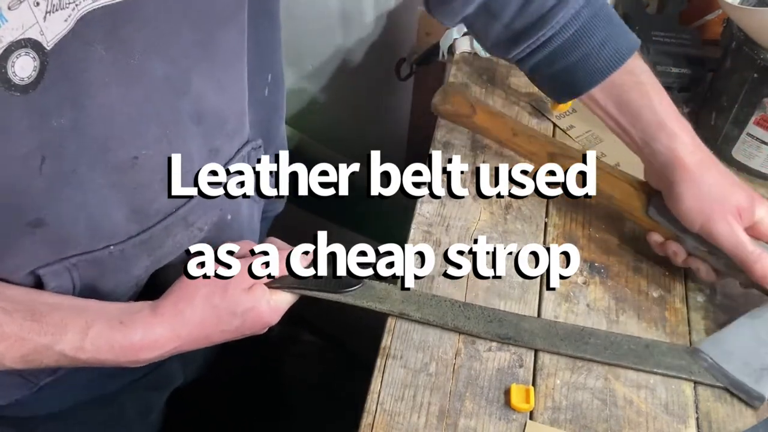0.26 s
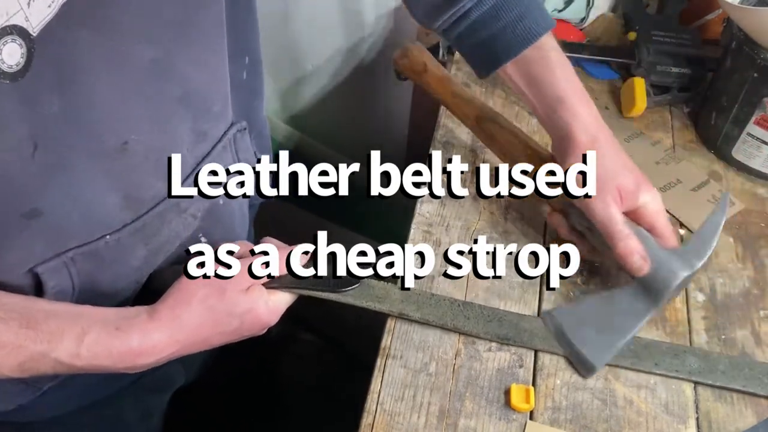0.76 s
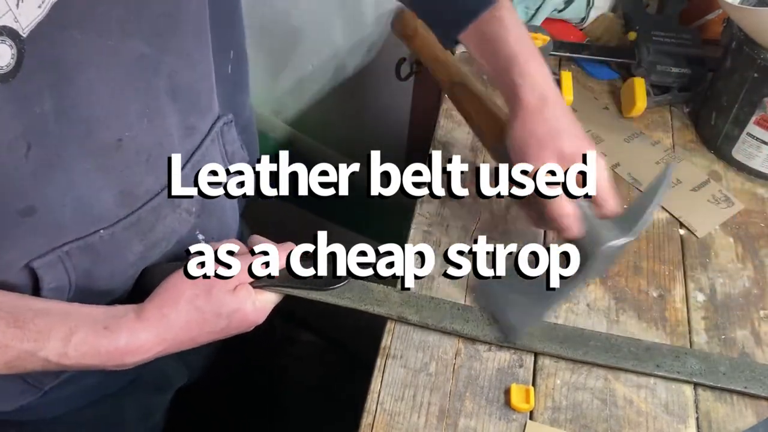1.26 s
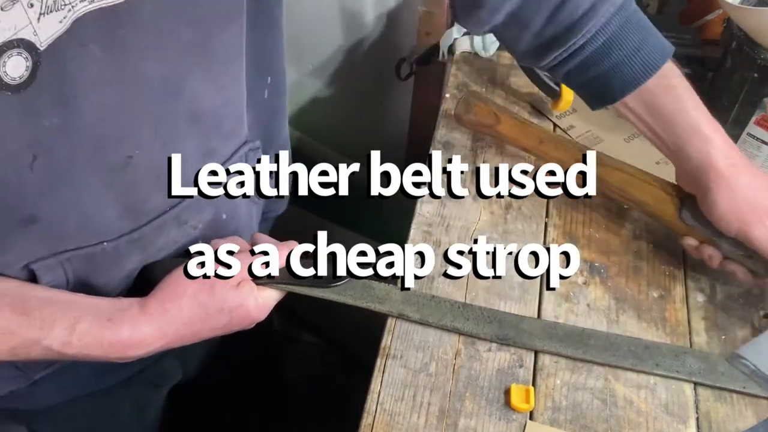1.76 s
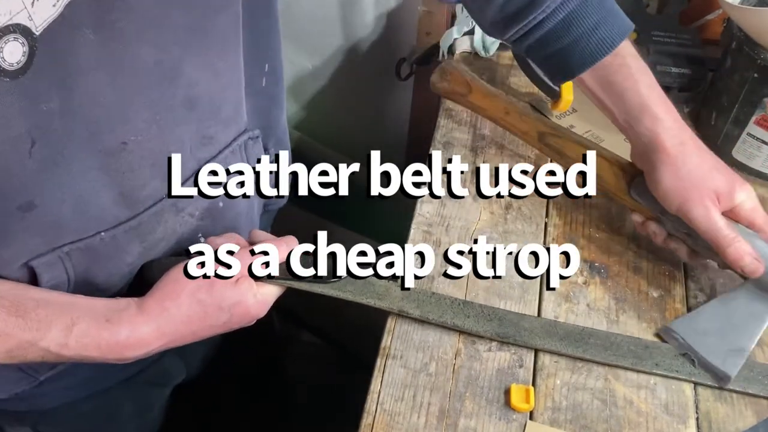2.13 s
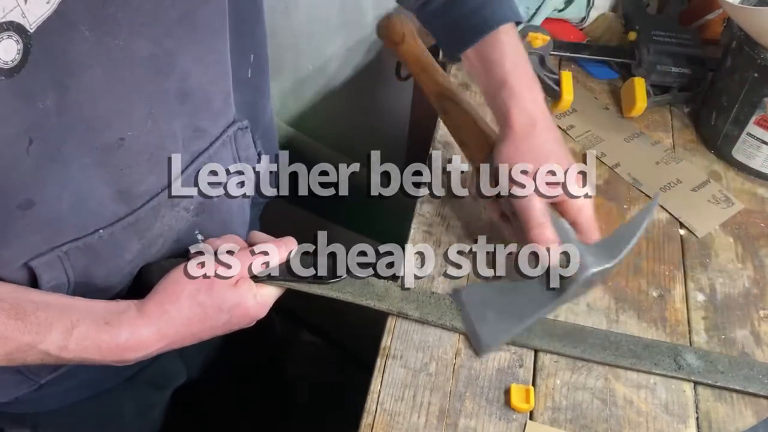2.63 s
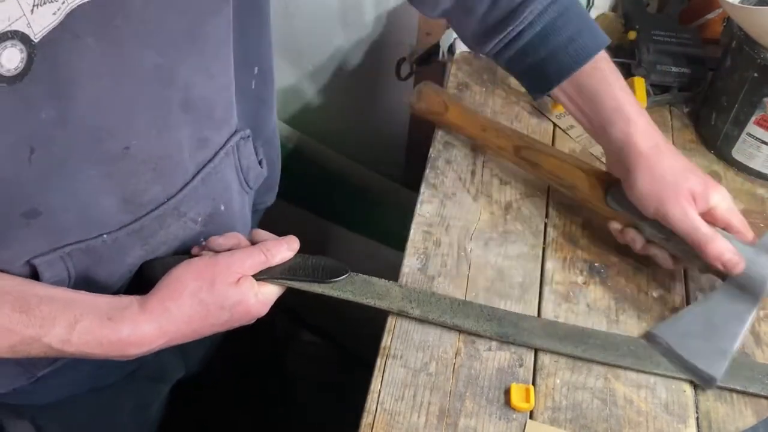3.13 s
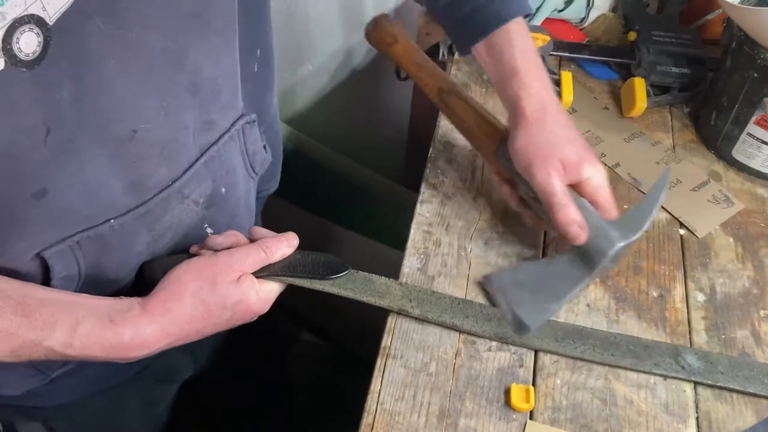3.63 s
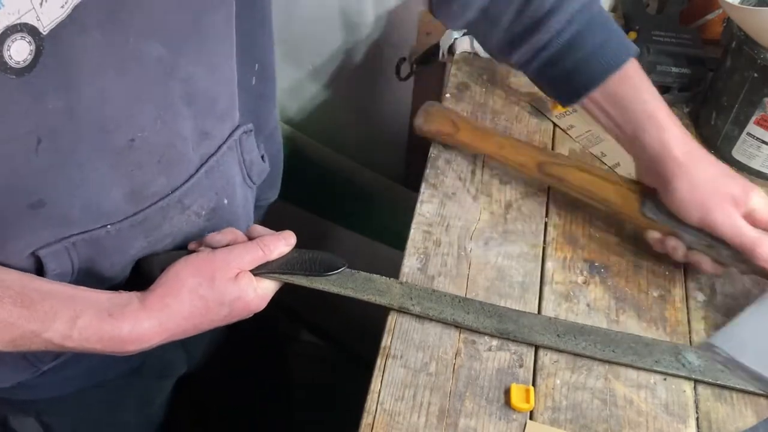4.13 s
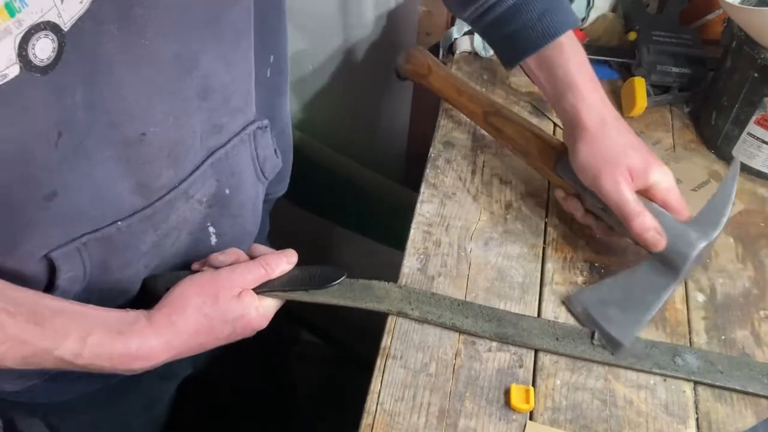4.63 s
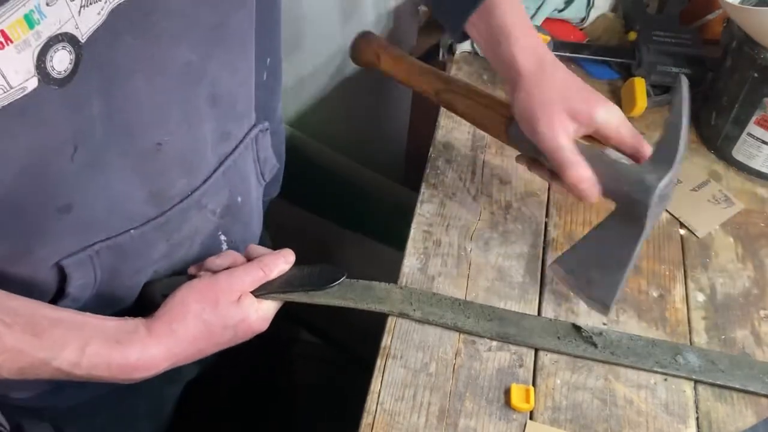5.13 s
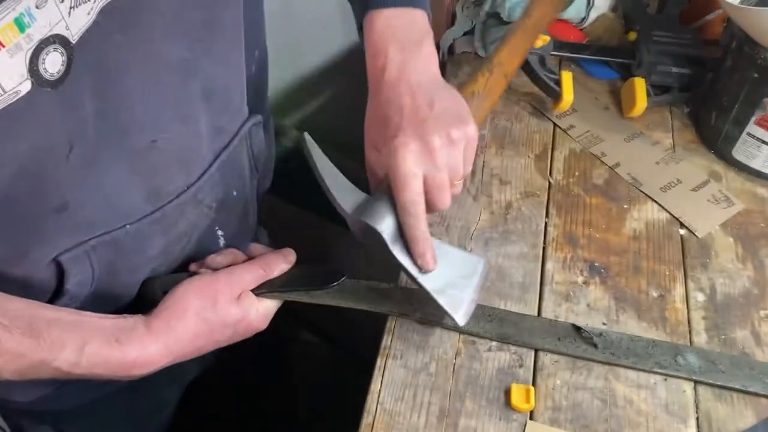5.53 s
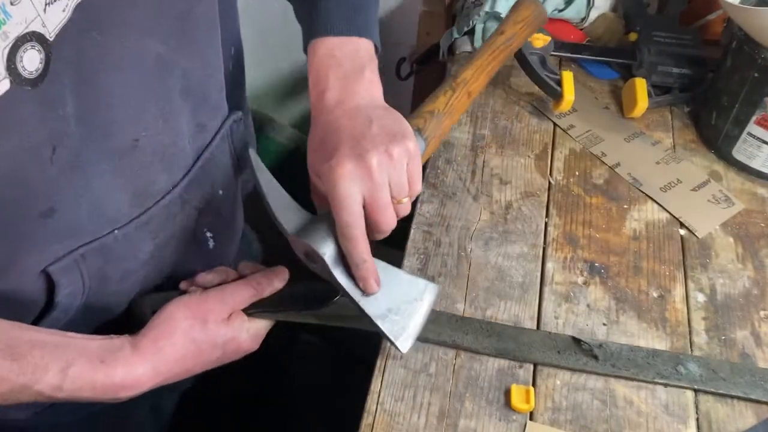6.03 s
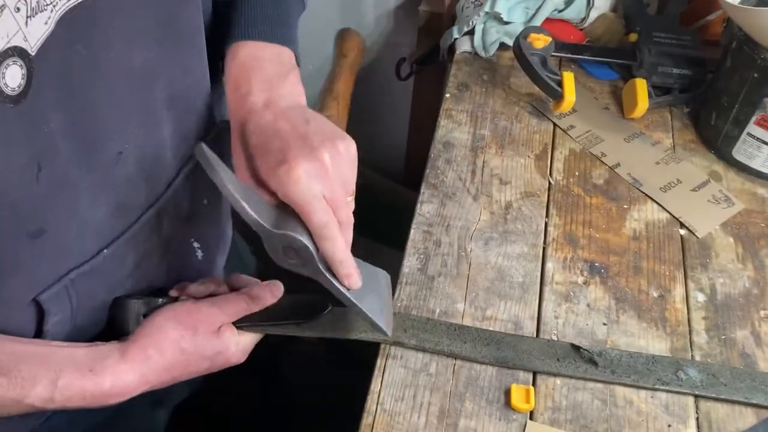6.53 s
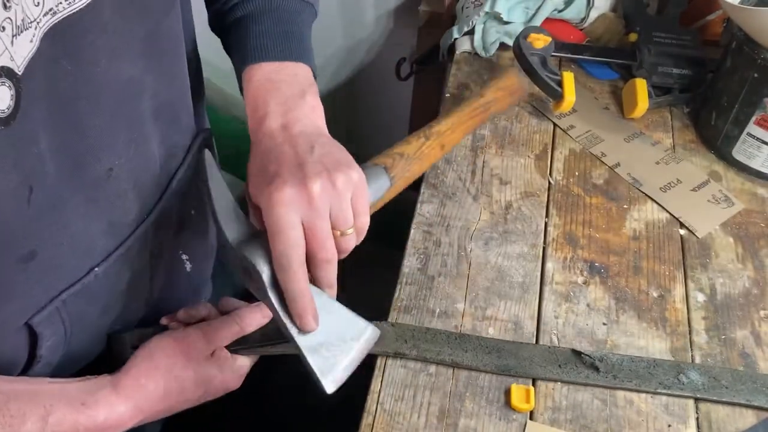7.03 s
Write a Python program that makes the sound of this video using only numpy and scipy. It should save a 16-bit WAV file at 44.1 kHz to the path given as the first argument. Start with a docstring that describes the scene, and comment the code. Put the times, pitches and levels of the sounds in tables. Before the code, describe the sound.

A small, dry workshop heard close to a phone, with quiet room air and a faint unsteady low hum throughout. From the start, steel rubs along a taut leather belt in irregular strokes, each swelling and fading as a soft hiss, fine scrape and low drag. A gentle thump lands at 1.3 s; a fuller rub with a short low belt groan comes around 2.4 s. Tiny gritty ticks and soft thumps follow at 3.0 and 4.0 s. The strongest, brightest stroke peaks near 4.4 s. A firm wooden knock with a clink falls at 4.7 s, another at 5.1, and a sharper steel clack pair with brief ringing at 5.4 to 5.5. Smaller taps run from 5.7 to 6.2 s amid scuffing. Fainter rubbing continues, with a tiny high squeak near 6.9 s, before a last, heavier cushioned thump at 7.2 s.

```python
"""A faint low hum and room air fill a small workshop, close to a phone, from start to end.
From the start a steel axe head is stropped on a taut leather belt over a wooden bench: noise that swells
and fades with the speed of the steel makes the hiss, scrape and rumble, and fuzzy tones make the belt groan.
From 1.3 s the head lands now and then with a soft thump, made of fading tones of belt, bench and steel.
From 4.7 to 6.2 s it knocks and clinks as it is turned over; more stropping and a last thump follow."""
import sys
import numpy as np
from scipy import signal
from scipy.fft import rfft, irfft, next_fast_len
from scipy.io import wavfile
from scipy.ndimage import map_coordinates

SR = 44100
rng = np.random.default_rng(int(sys.argv[2]) if len(sys.argv) > 2 else 0)


def unload_wav(signal):
    """Save mono or channel-first audio to the path in sys.argv[1] as 16-bit WAV at rate SR, clipped to [-1, 1]."""
    wavfile.write(
        sys.argv[1],
        SR,
        np.round(np.clip(np.atleast_2d(signal).T, -1, 1) * 32767).astype(np.int16),
    )


N = 321048
TIME = np.arange(N) / SR  # seconds

# All levels in the tables are relative: the functions below still balance the layers.
# noise colours of room air, bench rumble, edge hiss, scrape of the flat, drag on the belt,
# wood clack and sharp crack: pitch_hz, level_db (per Hz)
AIR_COLOUR = [(20, -19.5), (35, -6), (68, -0.5), (113, -13.5), (175, -11.5), (230, -22.5), (450, -27),
              (540, -27), (970, -27.5), (1500, -34.5), (2000, -41), (2500, -49.5), (4800, -63.5),
              (6000, -72), (15500, -69.5)]
RUMBLE_COLOUR = [(20, -25), (35, -4.5), (50, 3.5), (66, 12), (90, 1), (120, -6), (180, -6), (300, -60)]
HISS_COLOUR = [(1500, -23.5), (3000, -23.5), (5500, -11), (7500, -1), (9000, 2.5), (11500, 3),
               (13500, -1.5), (15500, -5)]
SCRAPE_COLOUR = [(400, -19.5), (900, 1), (1500, 1.5), (2200, 2.5), (3000, 3), (4500, 3.5), (6500, -3),
                 (9000, -7), (15000, -31.5)]
DRAG_COLOUR = [(70, -28), (130, 13.5), (200, 9.5), (290, 2), (380, -5.5), (520, -14.5), (700, -12),
               (1000, -15.5), (1500, -13), (2200, -42.5), (5000, -47.5)]
CLACK_COLOUR = [(120, -17.5), (300, -0.5), (750, 7.5), (1200, 4.5), (2000, -15), (3500, -29.5), (9000, -41)]
CRACK_COLOUR = [(400, -17), (1800, 6.5), (3500, 8.5), (5500, -3), (8000, -2.5), (11000, -6), (15500, -20.5)]

# how long the room rings on, by pitch: pitch_hz, fade_s (time to fall 60 dB)
WALL_FADE = [(80, 0.36), (300, 0.29), (1000, 0.18), (4000, 0.1), (14000, 0.09)]
# how alike left and right are, for sound from all around and sound from the work: pitch_hz, likeness (1 = same)
DIFFUSE_LIKENESS = [(60, 1), (130, 0.95), (290, 0.74), (640, 0), (1400, 0), (15000, 0.086)]
DIRECT_LIKENESS = [(60, .99), (200, 0.92), (700, 0.74), (3000, 0.06), (7000, 1), (13000, 1)]
# how much louder the left is than the right: pitch_hz, level_db
LEFT_LEAN = [(70, -2.2), (250, 1), (700, -1), (1300, 6.5), (2400, 6), (5000, 0)]
# how far the left microphone port lags behind the right:
# pitch_hz, lag_rad (read in a straight line between points)
LEFT_LAG = [(0, 0), (2700, 0), (15700, 18.9)]
TOP_HZ = 15800

# ringing tones of the belt over the bench top, the bench frame, the planks, and the axe head on its haft:
# pitch_hz, level_db, fade_s (time to fall 60 dB)
BELT_TONES = [(182.6, -17, 0.11), (201.7, -2, 0.13), (219.9, 0.5, 0.14), (276, -10, 0.08),
              (326, -25.5, 0.25), (417.4, -21.5, .18)]
FRAME_TONES = [(85.75, -1.5, 0.33), (96.8, -6, 0.5), (135.8, -5.5, 0.25), (173.2, -0.5, 0.19)]
PLANK_TONES = [(355, -8, 0.057), (442, -12, 0.15), (436.6, -4, 0.11), (558.8, -4.5, 0.15), (719, 1, 0.062),
               (800, 1, 0.084), (830, -4, 0.082), (891, -30, 0.038), (957, -19.5, 0.11), (1020, -8.5, 0.12),
               (1095, 3.5, 0.058), (1329, -2, 0.063)]
CLINK_TONES = [(1486, -5, .05), (1703, 3, 0.027), (1872, 2.5, 0.023), (2040, -6, 0.044),
               (2320, -17.5, 0.075), (2790, -17.5, .05), (3260, -22.5, .055), (3830, -17, 0.061)]
# longer tones of the blade and spike, which the grip lets through in turn: pitch_hz, level_db, fade_s
PING_TONES = [(1400, 10, 0.18), (2014, -5.5, 0.26), (2950, -1, 0.29), (3652, 2.5, 0.2)]
# resonances of bench and axe head that colour a stroke: pitch_hz, width_hz, level_db
BENCH_RESONANCES = [(426, 390, -3.5), (660, 56, 6), (890, 18, -2.5)]
HEAD_RESONANCES = [(1460, 330, 2.5), (1980, 76, 10.5), (2920, 37, -5), (3310, 37, -5), (3640, 80, 3),
                   (4386, 73, 0), (4750, 200, 3.5)]

# thin singing of the edge: centre_s, length_s (centre to 37 %), pitch_hz (before waver), level_db
EDGE_SQUEAKS = [(1.39, 0.015, 3655, -70.5), (1.97, 0.24, 3664, -81.5), (5.001, 0.0036, 2490, -72),
                (5.077, 0.025, 2400, -80), (6.896, 0.025, 10740, -74.5)]
# belt groans where the blade bears down: centre_s, length_s (centre to 37 %), pitch_hz, level_db
BELT_GROANS = [(0.796, 0.1, 280, -60), (1.98, 0.032, 330, -72.5), (2.204, 0.047, 455, -65),
               (2.463, .05, 290, -51.5), (3.43, 0.06, 290, -68.5)]
GROAN_FUZZ_PER_S = 82  # random knots a second that blur the note

# coarse grit catching under the edge: start_s, level_db
COARSE_GRIT = [(2.635, -61), (2.93, -65), (3.3183, -55), (3.707, -63), (3.743, -59), (4.9598, -57.5),
               (5.0014, -62.5), (5.57, -49.5), (5.6447, -58.5), (5.6874, -59), (5.856, -58),
               (5.8854, -67.5), (6.5275, -57.5), (6.744, -64)]
GRIT_PER_S, GRIT_OVER_HISS_DB = 12, 7.5  # fine grit, met by chance; the level is for the largest grain

# soft drops of the head on the belt: start_s, thump_db, plank_hz (favoured plank pitch)
SOFT_LANDINGS = [(1.326, -33, 856), (2.968, -38, 607), (4.001, -34, 790), (7.231, -27, 1070)]
USUAL_THUMP_DB, LANDING_RISE_S, LANDING_PING_HZ = -33.5, 0.0034, 3610
# what a landing sets off; rows are bench boom, wood clack, clink, ping, crack:
# level_db (at the usual thump), growth_db (gained per dB of thump)
LANDING_RESPONSE = [(-43.5, -0.3), (-40.5, 1.37), (-65.5, 2.5), (-87.5, 0.5), (-75, 1.77)]
# bare steel knocking on the bench: start_s, boom_db (bench), clack_db (wood), plank_hz (favoured pitch),
# clink_db, ping_db, ping_hz (favoured pitch), crack_db, rise_s
BENCH_KNOCKS = [ (4.714, -36, -23, 753, -43.5, -76, 2000, -62, .00066),
                (5.116, -33, -26, 640, -41.5, -58, 1990, -54.5, 0.003),
                (5.413, -38.5, -35, 630, -37, -58, 2950, -44, 0.00084),
                (5.498, -44, -43, 636, -38, -48.5, 1450, -60.5, 0.00021),
                (5.738, -48.5, -45, 696, -55, -51, 1400, -52, 0.0036),
                (5.887, -53.5, -56.5, 620, -71, -91, 1400, -79.5, 0.0014),
                (5.940, -50.5, -49, 734, -50, -64, 1400, -71, 0.00052),
                (5.971, -50.5, -58.5, 700, -77, -60, 1400, -70.5, 0.0051),
                (6.244, -49, -42.5, 713.5, -53.5, -76.5, 2000, -62, 0.0024)]
THUMP_OVER_BOOM_DB = -3.5  # the belt shakes along with the bench
SWAY_DB, SWAY_RISE_S, SWAY_FADE_S = 2, 0.03, 0.57  # bench rumble after a blow, relative to its boom

# strokes, parts of strokes, and short skids and scuffs of the steel on the belt, each swelling and fading:
# start_s, fastest_s, end_s, hiss_db (edge), scrape_db (flat of the blade), drag_db (belt)
RUBS = [ (-.05, 0.052, 0.16, -75.5, -88.5, -61.5), (0.09, 0.277, 0.64, -77, -81, -64),
        (0.528, 0.723, 1.06, -78, -81, -55), (1.06, 1.392, 1.58, -96.5, -83, -61.5),
        (1.542, 1.811, 2.88, -80, -84, -70), (2.29, 2.426, 2.56, -76, -76.5, -51),
        (2.524, 2.68, 3.32, -90.5, -89.5, -70.5), (3.1, 3.173, 3.44, -86, -88, -67),
        (3.225, 3.348, 3.72, -75.5, -80, -58), (3.983, 4.038, 4.18, -87, -78.5, -58.5),
        (4.145, 4.24, 4.6, -74.5, -79.5, -61.5), (4.255, 4.437, 4.754, -66, -69, -54),
        (4.93, 5.085, 5.15, -80.5, -83.5, -82), (5.19, 5.22, 5.68, -83.5, -85, -77),
        (5.453, 5.854, 5.96, -82, -79.5, -61), (5.9, 5.97, 6.4, -85.5, -86, -77),
        (6.16, 6.27, 7.21, -92, -79, -76.5), (6.35, 7.053, 7.25, -87, -82, -80)]
HISS_POWER, SCRAPE_POWER, DRAG_POWER = 0.78, 1, 0.87  # each layer's amplitude grows as speed to this power
SHAKE_OVER_HISS_DB, HELD_SHAKE_DB = 25.5, -56.5  # bench tremble from the stroke, and from the hand's pull


def amp(db):
    """Turn decibels into a gain."""
    return 10 ** (np.asarray(db) / 20)


def unit(x):
    """Scale to an average (rms) strength of 1."""
    return x / np.sqrt(np.mean(x ** 2) + 1e-20)


def along(points, hz):
    """Read a value between (pitch, value) points, with pitch on a log axis."""
    f, v = np.transpose(points)
    return np.interp(np.log(hz + 1), np.log(f + 1), v)


def wobble(rate):
    """Draw a smooth random curve with rate knots a second."""
    knots = rng.standard_normal(N)[:int(N * rate / SR) + 4]
    return map_coordinates(knots, [TIME * rate])


def filtered(x, response):
    """Change the strength or phase of each pitch in x by the given response."""
    n = x.shape[-1]
    m = next_fast_len(n + 8192)  # spare room so that tails do not wrap round
    return irfft(rfft(x, m) * response(np.fft.rfftfreq(m, 1 / SR)), m)[..., :n]


def paired(two, likeness):
    """Mix two unrelated signals into a left and right of the given likeness."""
    def shares(hz):
        turn = np.arccos(np.clip(along(likeness, hz), -1, 1)) / 2
        return np.array([np.cos(turn), np.sin(turn)])

    mid, side = filtered(two, shares)
    return np.array([mid + side, mid - side])


def noise(colour, likeness, size=N, grain=1):
    """Make coloured stereo noise of rms 1; grain is its fine rise and fall."""
    white = rng.standard_normal((2, size)) * grain
    return unit(filtered(paired(white, likeness), lambda hz: amp(along(colour, hz))))


def resonate(x, resonances):
    """Add the resonances of a solid body to x and scale to rms 1."""
    def body(f):
        total = 1
        for hz, width, db in resonances:
            total = total + amp(db) * 1j * f * width / (hz * hz - f * f + 1j * f * width)
        return total

    return unit(filtered(x, body))


def ring(tones, t, spread):
    """Sum fading tones at chance strengths; the higher ones reach the two ports more out of step."""
    hz, db, fade_s = np.transpose(tones)[:, :, None]
    chance = rng.standard_normal((3, len(tones), 1))
    sides = np.array([1, -1])[:, None, None]
    skew = sides * spread * chance[0] * np.minimum(hz / 1000, 1)
    phase = 2 * np.pi * hz * t + skew + chance[2] * np.minimum(hz / 500, 2)
    strength = amp(db + 2 * chance[1] - 60 * t / fade_s)
    return np.sum(strength * np.sin(phase), axis=1)


def struck(x, t, rise):
    """Give a struck sound its rise time in seconds, and rms 1 over its first 30 ms."""
    x = x * (1 - np.exp(-(t / rise) ** 2))
    return x / np.sqrt(np.mean(x[:, :int(0.03 * SR)] ** 2))


def favour(tones, main_hz, db_per_octave):
    """Weaken tones away from one pitch, as the point of contact favours those near it."""
    return [(hz, db - db_per_octave * abs(np.log2(hz / main_hz)), fade_s) for hz, db, fade_s in tones]


def add(track, s, x):
    """Mix x into the track at time s."""
    part = track[:, round(s * SR):][:, :x.shape[1]]
    part += x[:, :part.shape[1]]


def background():
    """Room air is coloured noise; the hum is one low tone, unsteady in pitch and level."""
    hum_phase = 2 * np.pi * 70 * TIME + 1.7 * wobble(1.3)
    hum = np.sin(hum_phase) * amp(1.1 * wobble(27))
    return amp(-59.5) * noise(AIR_COLOUR, DIFFUSE_LIKENESS) + amp(-66.0) * hum


def workshop(x):
    """The walls answer briefly with a noise-like tail whose treble dies first."""
    hz, t, z = signal.stft(rng.standard_normal((2, SR // 2)), SR, nperseg=256)
    fade = amp(-60 * t / along(WALL_FADE, hz)[:, None])
    tail = signal.istft(z * fade, SR, nperseg=256)[1]
    # the answer begins 1/150 s late
    tail = np.pad(paired(tail, DIFFUSE_LIKENESS), ((0, 0), (SR // 150, 0)))
    return signal.fftconvolve(x[:1], tail / np.linalg.norm(tail[0]), axes=1)[:, :N]


def nearby(x):
    """Bench top, tins and wall send back early copies, weak in the bass and different at each port."""
    delays = rng.uniform(0.0015, 0.014, (2, 6))  # seconds
    copies = np.array([sum(np.pad(x[0], (round(d * SR), 0))[:N] for d in port) for port in delays])
    colour = [(120, -24.5), (400, 6.0), (4000, 1), (12000, -25.0)]
    return filtered(copies, lambda hz: amp(along(colour, hz)))


def stroke_levels():
    """Each rub of steel on belt swells and fades; gains of hiss, scrape and drag follow its speed."""
    power = np.zeros((3, N))
    laws = np.array([[HISS_POWER], [SCRAPE_POWER], [DRAG_POWER]])
    for start, fastest, end, *db in RUBS:
        speed = np.interp(TIME, [start, fastest, end], [0, 1, 0])
        power += (amp(db)[:, None] * speed ** laws) ** 2
    return np.sqrt(power)


def tremble():
    """The pulled belt shakes the bench with a low rumble, more where the edge hisses louder."""
    stroke_shake = amp(SHAKE_OVER_HISS_DB) * stroke_levels()[0]
    return np.hypot(amp(HELD_SHAKE_DB), stroke_shake) * noise(RUMBLE_COLOUR, DIFFUSE_LIKENESS)


def squeaks():
    """Edge and leather stick and slip in brief tones, unsteady in pitch."""
    wavering_time = np.cumsum(1 + 0.0096 * wobble(400)) / SR
    out = np.zeros(N)
    for s, length, hz, db in EDGE_SQUEAKS:
        swell = np.exp(-((TIME - s) / length) ** 2)
        out += amp(db) * swell * np.sin(2 * np.pi * hz * wavering_time)
    return out


def groans():
    """The belt sounds a damped, fuzzy note under the blade: a tone blurred by random curves."""
    fuzz = wobble(GROAN_FUZZ_PER_S) + 1j * wobble(GROAN_FUZZ_PER_S)
    out = np.zeros(N)
    for s, length, hz, db in BELT_GROANS:
        swell = np.exp(-((TIME - s) / length) ** 2)
        out += amp(db) * swell * np.real(fuzz * np.exp(2j * np.pi * hz * TIME))
    return out


def ticks():
    """Grit snaps under the edge: a few coarse grains, and fine ones scattered along the strokes."""
    out, t = np.zeros((2, N)), np.arange(SR // 16) / SR
    hiss_gain = stroke_levels()[0]
    grains = [(s, amp(db - 7.0)) for s, db in COARSE_GRIT]
    for when, size in rng.random((int(GRIT_PER_S * N / SR), 2)):
        grains.append((when * N / SR, size * amp(GRIT_OVER_HISS_DB) * hiss_gain[int(when * N)]))
    colour = [(600, -16.5), (2000, 1.5), (8000, 7.5), (15500, 3.5)]
    for s, gain in grains:
        snap = noise(colour, DIRECT_LIKENESS, size=len(t))
        add(out, s, gain * amp(-60 * t / 0.027) * snap)
    return out


def clatter(t):
    """A crowd of weak bench tones sounds like noise that fades at its own rate for each pitch."""
    hz, frames, z = signal.stft(noise(CLACK_COLOUR, DIRECT_LIKENESS, size=len(t)), SR, nperseg=256)
    fade_s = along([(200, 0.25), (800, 0.03), (2500, 0.057)], hz)[:, None]
    return signal.istft(z * amp(-60 * frames / fade_s), SR, nperseg=256)[1][:, :len(t)]


def blow(s, thump_db, boom_db, clack_db, clink_db, ping_db, crack_db, plank_hz, ping_hz, rise):
    """One contact shakes belt, bench and planks, and makes the steel clink, ping and crack."""
    out, t = np.zeros((2, N)), np.arange(SR // 2) / SR
    thump = struck(ring(BELT_TONES, t, spread=0.22), t, rise=0.0096)
    boom = struck(ring(FRAME_TONES, t, spread=0.3), t, rise=0.018)
    planks = struck(ring(favour(PLANK_TONES, plank_hz, db_per_octave=19.5), t, spread=0.74), t, rise)
    clink = struck(ring(CLINK_TONES, t, spread=0.89), t, rise)
    ping = struck(ring(favour(PING_TONES, ping_hz, db_per_octave=23.5), t, spread=0.47), t, rise)
    crack_noise = noise(CRACK_COLOUR, DIRECT_LIKENESS, size=len(t))
    crack = struck(crack_noise * amp(-60 * t / 0.043), t, rise=0.0002)

    # the head brushes the leather just before it lands
    graze = noise(CLACK_COLOUR, DIRECT_LIKENESS, size=len(t)) * np.exp(-((t - 0.014) / 0.0079) ** 2)
    add(out, s - 0.012, amp(clack_db - 16) * graze)
    # belt and bench give way after first touch
    add(out, s + 0.00255, amp(thump_db - 0.5) * thump + amp(boom_db - 1.5) * boom)
    # the bench goes on rumbling
    sway_shape = amp(-60 * t / SWAY_FADE_S) * (1 - np.exp(-t / SWAY_RISE_S))
    sway = noise(RUMBLE_COLOUR, DIFFUSE_LIKENESS, size=len(t)) * sway_shape
    add(out, s, amp(boom_db + SWAY_DB) * sway)
    add(out, s, amp(clack_db - 6.5) * planks + amp(clack_db - 10) * struck(clatter(t), t, rise))
    add(out, s, amp(clink_db - 7.0) * clink + amp(ping_db) * ping + amp(crack_db) * crack)
    return out


def landings():
    """The belt cushions the head; a harder drop lets more wood and steel sound through."""
    out = np.zeros((2, N))
    for s, thump_db, plank_hz in SOFT_LANDINGS:
        levels = [db + growth * (thump_db - USUAL_THUMP_DB) for db, growth in LANDING_RESPONSE]
        out += blow(s, thump_db, *levels, plank_hz, LANDING_PING_HZ, LANDING_RISE_S)
    return out


def knocks():
    """The head knocks on the planks as it is turned over; belt and bench frame shake along."""
    out = np.zeros((2, N))
    for s, boom_db, clack_db, plank_hz, clink_db, ping_db, ping_hz, crack_db, rise in BENCH_KNOCKS:
        thump_db = boom_db + THUMP_OVER_BOOM_DB
        out += blow(s, thump_db, boom_db, clack_db, clink_db, ping_db, crack_db, plank_hz, ping_hz, rise)
    return out


def stropping():
    """Leather fibres slip under the steel in fine grains, faintly ringing the head and the bench."""
    hiss_gain, scrape_gain, drag_gain = stroke_levels()
    # fibres slip in grains of several sizes at once
    grain = amp(2.4 * wobble(2500) + 1.4 * wobble(300) + 1.0 * wobble(55) + 1.3 * wobble(14))
    hiss = noise(HISS_COLOUR, DIRECT_LIKENESS, grain=grain)
    scrape = resonate(noise(SCRAPE_COLOUR, DIRECT_LIKENESS, grain=grain), HEAD_RESONANCES)
    drag_noise = noise(DRAG_COLOUR, DIRECT_LIKENESS, grain=amp(3.1 * wobble(70)))
    drag = resonate(drag_noise, BENCH_RESONANCES)
    return amp(3.5) * hiss_gain * hiss + amp(4.0) * scrape_gain * scrape + drag_gain * drag


def scene():
    """The work lies a little to one side of two microphone ports, with echoes and room air around it."""
    work = stropping() + groans() + landings() + knocks() + ticks() + squeaks()
    sides = np.array([[0.5], [-0.5]])  # each port takes half of a left-right difference
    lag_points = np.transpose(LEFT_LAG)
    direct = filtered(work, lambda hz: np.exp(-1j * sides * np.interp(hz, *lag_points)))
    near = filtered(direct + tremble(), lambda hz: amp(sides * along(LEFT_LEAN, hz)))
    echoes = amp(-14.5) * nearby(work) + amp(-15.5) * workshop(work)
    return near + echoes + amp(-1.2 * sides) * background()


def record(dry):
    """The phone keeps nothing above its band limit."""
    return filtered(dry, lambda hz: hz < TOP_HZ)


dry = scene()
out = record(dry)
unload_wav(out)
```